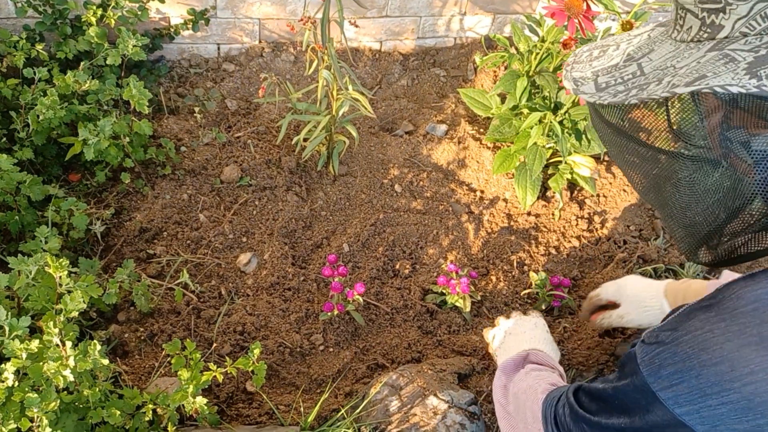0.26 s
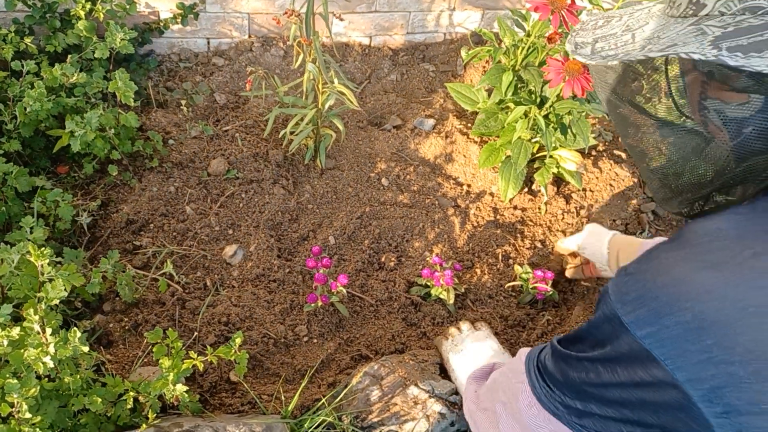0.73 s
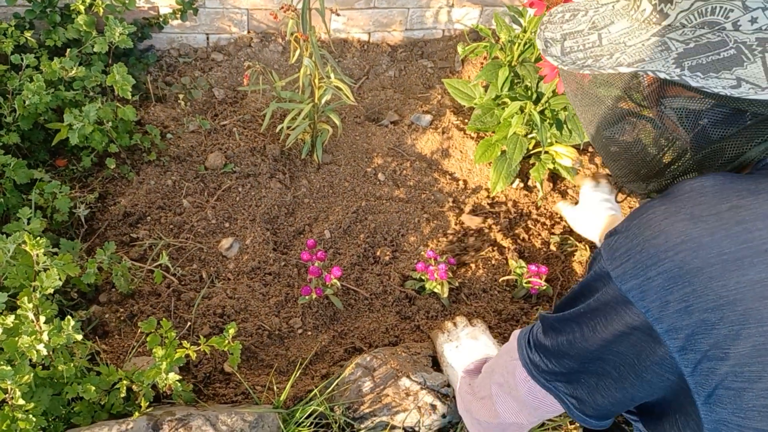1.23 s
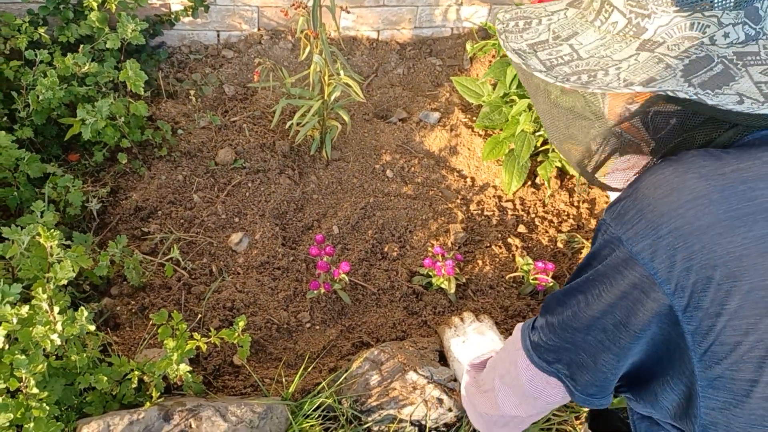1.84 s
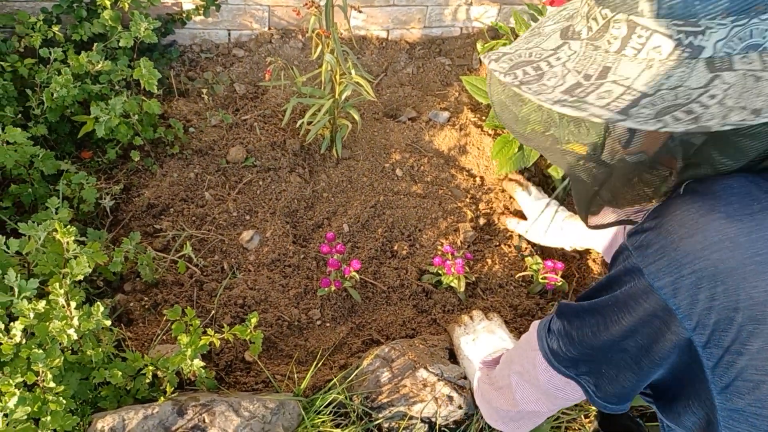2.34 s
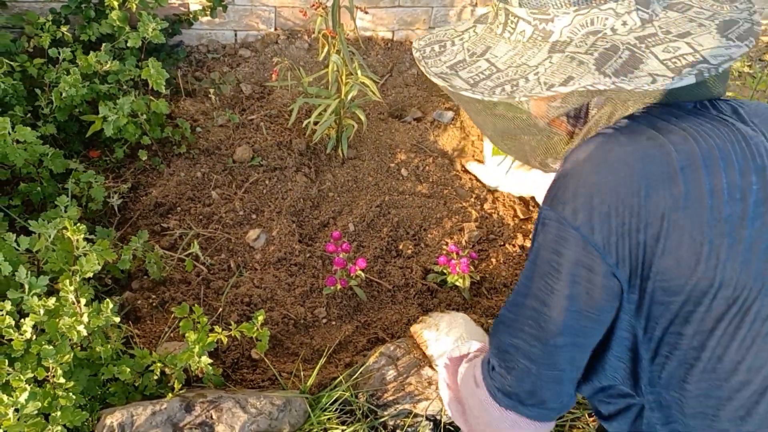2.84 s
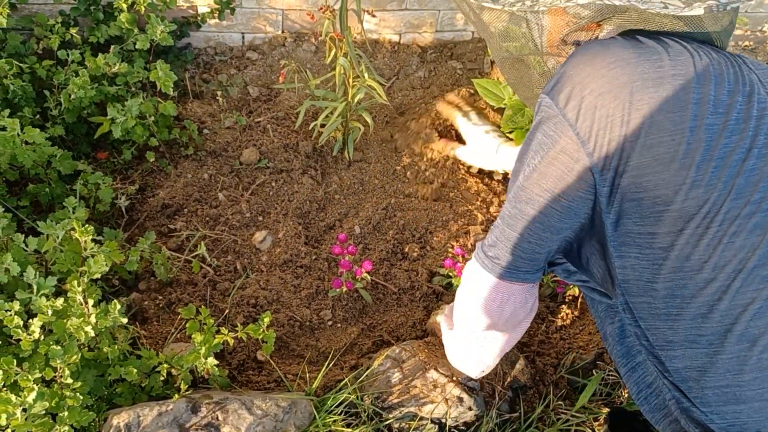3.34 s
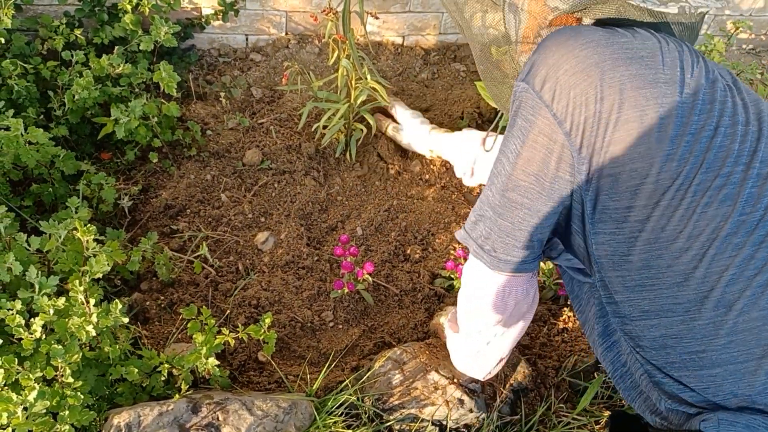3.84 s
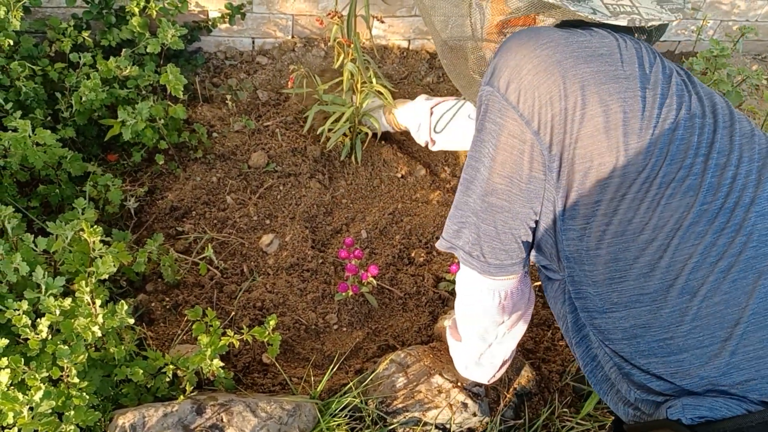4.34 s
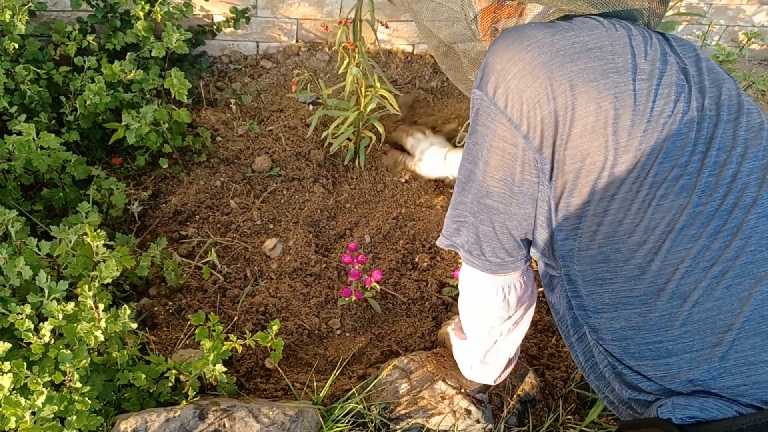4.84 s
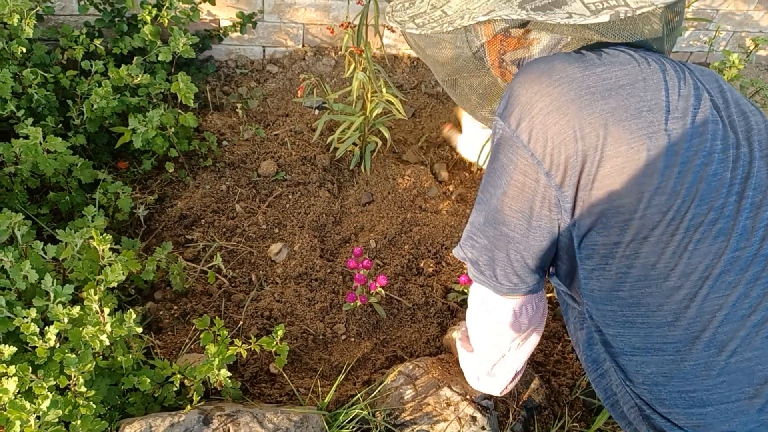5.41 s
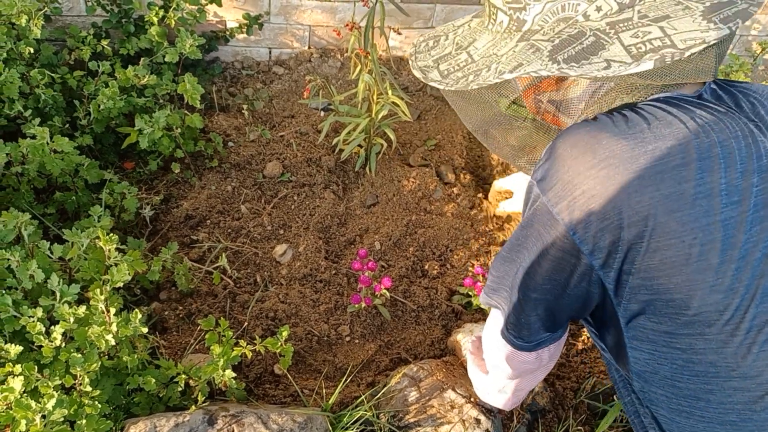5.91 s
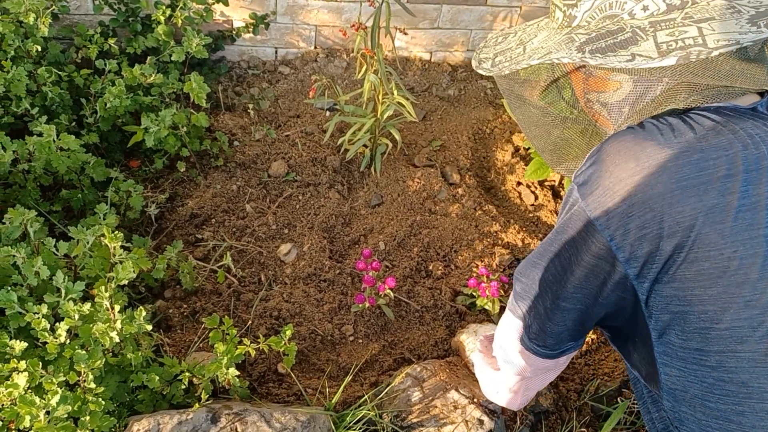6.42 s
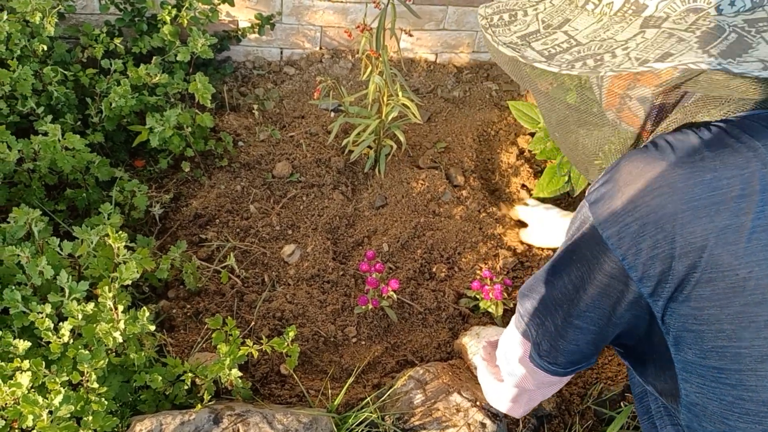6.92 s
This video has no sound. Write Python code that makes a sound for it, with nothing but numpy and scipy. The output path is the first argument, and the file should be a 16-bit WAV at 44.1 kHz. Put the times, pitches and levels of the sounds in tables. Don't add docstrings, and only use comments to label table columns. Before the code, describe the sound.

An open farmyard with a soft, swelling hum of distant machinery and air. At 0 s a cow's low is already ending, sinking by 0.45 s, while a close gloved hand scrapes crumbly soil and thin metal trinkets ring very high, busiest around 0.5 s and continuing until 2.6 s. A thin calf call wavers at 0.7-1.5 s. From 1.4 to 3.2 s a long moo climbs, holds loud, then drops and closes, with short closed-mouth grunts around it. A hard crunch of soil and cracking clods comes near 3 s; lighter raking follows. Sparrows chirp throughout, one nearer at 1.8, 3.3, 5.2 and 6.95 s. From 4.9 to 6.2 s several further cattle overlap, deep, hoarse and high, with echo; a higher calf call follows at 5.6-6.6 s. From 6.3 s wind buffets the right side in low thumps, strongest near 7 s, with a few muffled clinks.

```python
import sys
import numpy as np
from scipy import signal
from scipy.fft import rfft, irfft
from scipy.io import wavfile
from scipy.ndimage import uniform_filter1d

SR = 44100
rng = np.random.default_rng(int(sys.argv[2]) if len(sys.argv) > 2 else 0)


def waveform_to_disk(signal):
    frames = np.transpose(np.atleast_2d(signal))
    scaled = np.clip(frames, -1, 1) * 32767
    samples = np.round(scaled).astype(np.int16)
    wavfile.write(sys.argv[1], SR, samples)


def natural_amplitude(level_db):
    exponent = np.asarray(level_db, float) / 20
    return 10 ** exponent


N = 316197
T = np.arange(N) / SR


def level(x, db):
    return x * natural_amplitude(db) / np.sqrt(np.mean(x ** 2))


def band(x, lo_hz, hi_hz, order=2):
    return signal.sosfilt(signal.butter(order, [lo_hz, min(hi_hz, .45 * SR)], "bandpass", fs=SR, output="sos"), x)


def colour(x, points):
    hz, db = np.transpose(points)
    f = np.maximum(np.fft.rfftfreq(N, 1 / SR), 1)
    return irfft(rfft(x) * natural_amplitude(np.interp(np.log(f), np.log(hz), db)), N)


def walk(rate_hz, size=N):
    k = int(SR / rate_hz)
    held = np.repeat(rng.standard_normal(size // k + 1), k)
    return 1.386 * uniform_filter1d(uniform_filter1d(held, k), k)[:size]


def play(table, fade_s=0.014):
    s, *columns = np.transpose(table)
    span = slice(int(s[0] * SR), int(s[-1] * SR))
    t = T[span]
    since_start = t - s[0] + (s[0] < .01)
    ends = np.clip(np.minimum(since_start, s[-1] - t) / fade_s, 0, 1)
    return span, ends, [np.interp(t, s, c) for c in columns]


def add(out, start_s, x):
    i = int(start_s * SR)
    out[..., i:i + x.shape[-1]] += x[..., :max(N - i, 0)]


def swells(start_s, level_db, rise_s, fall_s, hold_s):
    curves = []
    for s, db, rise, fall, hold in np.broadcast(start_s, level_db, rise_s, fall_s, hold_s):
        away = np.maximum((s - T) / rise, (T - s - hold) / fall)
        curves.append(db - 20 * np.maximum(away, 0))
    return natural_amplitude(np.max(curves, axis=0))


def place(x, pan_db, lag_s, wet_db, t60):
    t = T[:SR // 3]
    echoes = rng.standard_normal((2, len(t))) * np.exp(-np.log(1000) * t / t60) * np.clip(t / 0.006, 0, 1)
    echoes *= natural_amplitude(wet_db) / np.sqrt(np.sum(echoes ** 2, axis=1, keepdims=True))
    echoes *= natural_amplitude(np.array([[pan_db], [-pan_db]]) / 2)
    left = np.interp(T - lag_s, T, x)
    direct = np.array([left * natural_amplitude(pan_db / 2), x * natural_amplitude(-pan_db / 2)])
    return direct + signal.fftconvolve(x[None], echoes, axes=1)[:, :N]


def thump(peak_db, hz, cycles=2.0):
    t = T[:SR // 10] * hz / cycles
    return natural_amplitude(peak_db) * np.e * 3 * t * np.exp(-3 * t) * np.sin(2 * np.pi * cycles * t)


def ring(hz, centre_hz, width_hz):
    return 1 / (1 + (2 * (hz - centre_hz) / width_hz) ** 2)


# freq_hz, density_db (per Hz)
FARM_SPECTRUM = [(15, -56), (25, -26), (133, 2), (189, -3.5), (242, 1), (415, -15), (860, -14), (1320, -33),
                 (1930, -41), (2820, -34.5), (3700, -25), (4350, -27), (5850, -35), (9770, -35),
                 (15900, -40)]
# time_s, level_db
MACHINERY_SWELL = [(0, 2), (.7, 0.5), (1.3, -3), (1.6, 2), (3.0, 3.5), (3.3, -4), (4.5, -3.5), (5.3, 2.5),
                   (6.0, 2), (6.3, -1.5), (7.17, -1)]


def farm():
    out, swell = 0, walk(1.69)
    rumble_db = np.interp(T, *np.transpose(MACHINERY_SWELL))
    noise = level(colour(rng.standard_normal((2, N)), FARM_SPECTRUM), -61)
    sides = np.array([[1], [-1]])
    for hz in 30 * 2 ** np.arange(.75, 9.5, .75):
        mid, side = band(noise, hz / 2 ** .375, hz * 2 ** .375)
        width = min(0.022 + hz / 900, 1)
        tilt = natural_amplitude(-1.8 * min(hz / 2500, 1) * sides)
        flicker_db = 0.26 * swell + 2.1 * walk(8) + rumble_db * ((hz > 60) & (hz < 1200))
        out = out + tilt * natural_amplitude(flicker_db) * (mid + width * side * sides)
    return out


# time_s, second_partial_hz, level_db, mouth_opening_db
CALF_CALLS = [
    [(.68, 800, -81, 6), (.76, 827, -73, 0), (.9, 840, -62, -22), (.99, 844, -69, -17),
     (1.05, 846, -68, -3), (1.12, 836.7, -63, -14), (1.3, 847.4, -71.5, -15), (1.5, 835, -67, -6)],
    [(5.6, 782, -85, 8), (5.7, 825, -74.5, -2), (5.85, 867.6, -68.5, -4), (6.0, 900, -63.5, -16),
     (6.1, 902.6, -73.5, -6), (6.3, 913, -70.5, -2), (6.4, 900, -59.5, -18), (6.47, 830, -73, -17),
     (6.62, 850, -81.5, -12)],
]


def calf():
    out = np.zeros(N)
    for table in CALF_CALLS:
        span, ends, (hz, level_db, open_db) = play(table)
        phase = 2 * np.pi * np.cumsum(hz * (1 + 0.0091 * walk(60.1, len(hz)))) / SR
        for k, db in zip((2, 3, 4), (0, open_db - 15, open_db)):
            gain = natural_amplitude(level_db + db + 3.7 * walk(30.46, len(hz)))
            out[span] += 2.0 * ends * gain * np.sin(k * phase / 2)
    return out


CHEST_HZ, CHEST_WIDTH_HZ, THROAT_WIDTH_HZ = 263, 236, 227
# freq_hz, width_hz, level_db
MOUTH_RINGS = [(1325, 290, -1.5), (1803, 110, -14), (2210, 700, -20)]


def cow(table, odd_db, chest_hz, mouth_scale, rough, slack, air_db):
    span, ends, (hz, chest_db, throat_db, throat_hz) = play(table, fade_s=0.098)
    mouth_db = -2.5 + 0.59 * throat_db
    mouth_shift = mouth_scale * (throat_hz / 830) ** 0.27
    n = len(hz)
    rough = np.clip(rough + slack * (1 - hz / hz.max()), 0, 1)
    phase = 2 * np.pi * np.cumsum(hz * (1 + 0.026 * rough * walk(50.6, n))) / SR
    out = np.zeros(N)
    for k in range(1, 14):
        tract = ring(k * hz, chest_hz, CHEST_WIDTH_HZ)
        tract += natural_amplitude(throat_db) * ring(k * hz, throat_hz, THROAT_WIDTH_HZ)
        for ring_hz, width_hz, db in MOUTH_RINGS:
            tract += natural_amplitude(mouth_db + db) * ring(k * hz, ring_hz * mouth_shift, width_hz)
        fade_db = air_db * walk(7.28, n) + 7 * rough * walk(30.4, n) + (k % 2) * odd_db
        skirt = 1 + 2.54 * np.sqrt(rough * min(k / 4, 1)) * walk(160, n)
        out[span] += tract * natural_amplitude(fade_db) * skirt * np.sin(k * phase + rng.uniform(0, 2 * np.pi))
    out[span] *= natural_amplitude(chest_db) * ends
    return out


# time_s, pitch_hz, level_db, mouth_opening_db, throat_hz
COW_LOW = [
    (4.9, 106.6, -77, -36, 481),
    (5.15, 118.2, -57.5, -24, 600),
    (5.266, 131.4, -63, -11.5, 597),
    (5.36, 141.2, -71, 14, 520),
    (5.46, 141.3, -71.5, 18, 540),
    (5.6, 146, -76, 22.5, 570),
]
COW_HOARSE = [
    (5.42, 244.7, -79, 8, 520),
    (5.52, 246.5, -70, 8, 520),
    (5.6, 245.3, -61, 10, 590),
    (5.66, 249.5, -63.5, 11.5, 550),
    (5.74, 254.3, -64, 8.8, 620),
    (5.87, 252, -64, 6.1, 605),
    (5.96, 245.7, -71, 5.9, 560),
    (6.1, 233, -86, 3.1, 558),
]
COW_STEADY = [
    (5.36, 234.3, -79, 4, 935),
    (5.47, 235.4, -71, 8.5, 915),
    (5.6, 236.6, -59, -5, 867),
    (5.72, 239.5, -45.5, -19.5, 730),
    (5.8, 237.1, -54, -7, 786),
    (5.88, 234.6, -45, -29, 780),
    (5.97, 231.1, -57.5, -24, 720),
    (6.2, 227.3, -78.5, -20, 700),
]
HEIFER = [
    (5.15, 389, -75, -2, 790),
    (5.24, 396, -65, 3.5, 790),
    (5.32, 397, -73, 5.5, 790),
    (5.42, 398, -87, 3, 790),
]


def far_cows():
    out = cow(COW_LOW, 0.16, 120, 0.78, rough=0.09, slack=0.011, air_db=2.5)
    out += cow(COW_HOARSE, 0.11, 250, 0.884, rough=0.24, slack=0.19, air_db=1.5)
    out += cow(COW_STEADY, 0.1, 245, 0.69, rough=0.13, slack=0.35, air_db=2.4)
    return out + cow(HEIFER, 0.1, 395, 0.82, rough=0.045, slack=0.1, air_db=2.5)


# start_s, peak_db, pitch_hz
GRUNTS = [(0.3, -49, 280), (0.358, -49.5, 293), (1.551, -47, 230), (1.619, -45, 263), (2.016, -49.5, 187),
          (3.0, -42.5, 283.5), (3.074, -42.5, 290.7), (5.191, -51.5, 223), (5.29, -50, 208),
          (6.454, -41.5, 262), (6.51, -47.5, 266), (6.553, -46.5, 279), (6.631, -56, 260)]


def grunts():
    out = np.zeros(N)
    for start_s, peak_db, hz in GRUNTS:
        add(out, start_s, thump(peak_db, hz, cycles=6.5))
    return out


# time_s, pitch_hz, level_db, mouth_opening_db, throat_hz
COW_TAIL = [
    (0.0, 182.3, -53.5, 4.5, 1040),
    (0.19, 175.8, -57, 4, 990),
    (0.27, 160.4, -50, -15.5, 844),
    (0.45, 135.8, -74.5, -16, 825),
]
COW_LONG = [
    (1.41, 138.8, -72, 10.5, 1010),
    (1.62, 167.4, -58, 5, 976),
    (1.76, 178.5, -61.5, 17, 1032),
    (1.97, 193, -55, 5.5, 790),
    (2.382, 198.9, -45.5, -3.5, 867),
    (2.648, 194.4, -54, 11.5, 740),
    (2.856, 188.9, -47, -8.5, 744),
    (2.968, 158.8, -54, 4, 1070),
    (3.2, 135, -66, -59, 830),
]


def near_cow():
    tail = cow(COW_TAIL, -1.1, CHEST_HZ, 1.06, rough=0.016, slack=1.0, air_db=1.4)
    long_low = cow(COW_LONG, -0.19, 319, 1.0, rough=0.011, slack=0.13, air_db=2.08)
    return tail + long_low + grunts()


def whistle(hz, db, warble):
    n = len(hz)
    throb = natural_amplitude(db + 3.48 * walk(267.0, n))
    return throb * np.sin(2 * np.pi * np.cumsum(hz * (1 + warble * walk(900, n))) / SR)


def glide(centre_hz, octaves, db, length_s, warble):
    u = np.linspace(0, 1, int(length_s * SR))
    return np.sin(np.pi * u) * whistle(centre_hz * 2 ** (octaves * (2 * u - 1)), db, warble)


# start_s, peak_db
CHIRRUPS = [
    (1.82, -44),
    (3.3316, -42.5),
    (5.1792, -46.5),
    (6.9536, -43.5),
]
# time_s (after the start), pitch_hz, level_db
PHRASE = [
    (0, 3780, -6),
    (.008, 4320, -4.5),
    (0.02, 4710, 3.5),
    (.036, 4880, 3),
    (.039, 3986, 4),
    (0.048, 3500, 1.5),
    (.064, 3240, 1),
    (0.079, 3250, -27),
]
# start_s, peak_db, centre_hz, half_sweep_octaves
PEEPS = [(1.223, -64, 5860, 0.037), (1.254, -58.5, 4610, 0.15), (1.315, -67, 6260, 0.022),
         (1.36, -65, 4780, 0.09), (1.86, -58, 5810, 0.041), (1.924, -58.5, 4080, 0.13),
         (2.451, -64.5, 4510, 0.091), (2.489, -61.5, 3920, -0.031), (3.67, -66, 5800, 0),
         (5.725, -65, 5690, -0.0066), (5.827, -70, 5950, 0.011)]
# start_s, peak_db, centre_hz, half_sweep_octaves, length_s
NOTES = [(.648, -58, 4940, 0.1, 0.013), (0.658, -61, 6000, 0, 0.026), (0.68, -55, 5070, -0.15, 0.011),
         (0.686, -59, 3920, -0.147, 0.044), (0.719, -56.5, 3970, .16, .018),
         (1.903, -49, 3890, 0.082, 0.0096), (2.325, -65, 3920, -0.018, 0.038),
         (2.531, -60.5, 3650, 0.2, 0.014), (2.279, -63.5, 4500, -0.036, 0.074),
         (2.439, -66, 4500, 0.082, 0.027), (2.469, -60.5, 5850, 0, .035), (3.131, -63, 5750, 0, 0.033),
         (3.155, -57.5, 3900, -0.042, 0.029), (3.194, -61.5, 3700, 0.18, 0.017),
         (4.328, -71, 4550, 0, 0.084), (4.36, -67, 3800, .05, 0.044), (4.518, -66, 4500, 0.14, 0.068),
         (4.95, -62, 5500, 0.019, 0.028), (5.01, -62, 3800, 0.23, .016), (6.034, -71.5, 4900, 0, 0.14),
         (6.051, -65, 4550, -0.047, 0.059), (3.69, -63.5, 4200, -0.084, 0.0345),
         (3.763, -66, 6060, 0, 0.037), (3.901, -60, 4970, -0.021, 0.019), (3.902, -65, 3980, 0.036, 0.014),
         (5.756, -66, 3950, -0.092, 0.028), (5.79, -71, 3360, -0.0035, 0.023),
         (6.016, -75, 4730, -0.0041, 0.061), (6.101, -65.5, 4580, -0.072, 0.059),
         (6.105, -69, 3990, -0.04, 0.084), (6.421, -72, 3434, 0.013, 0.12),
         (6.494, -66, 4900, -0.0077, 0.023)]
# start_s, peak_db, centre_hz
CHEEPS = [(0.1172, -54, 4180), (0.4742, -59, 4400), (0.58, -61.5, 4450), (0.64, -60, 3900),
          (1.376, -57.5, 3930), (1.42, -65, 3530), (1.506, -57, 4230), (1.656, -54.5, 4310),
          (1.6836, -56.5, 3615), (2.0548, -53, 4280), (3.289, -54.5, 4450), (3.6667, -56.5, 4410),
          (3.86, -59, 3840), (3.93, -57.5, 3650), (4.325, -61, 4500), (4.3737, -70, 3850),
          (4.94, -55.5, 4550), (4.98, -57.5, 3615), (5.28, -56, 4010), (5.4737, -60.5, 4458),
          (5.769, -72, 3940), (6.49, -60, 4310), (6.765, -57.5, 3740), (6.845, -60, 4360)]


def sparrows():
    near, others, far = np.zeros((3, N))
    s, hz, db = np.transpose(PHRASE)
    t = T[:int(s[-1] * SR)]
    for start_s, peak_db in CHIRRUPS:
        phrase_db = peak_db - 5 + np.interp(t, s, db)
        add(near, start_s, whistle(np.interp(t, s, hz), phrase_db, warble=0.032))
    for start_s, peak_db, centre_hz, octaves in PEEPS:
        add(others, start_s, glide(centre_hz, octaves, peak_db + 4.5, 0.0266, warble=0.019))
    for start_s, peak_db, centre_hz, octaves, length_s in NOTES:
        add(others, start_s, glide(centre_hz, octaves, peak_db + 1.5, length_s, warble=0.012))
    for start_s, peak_db, centre_hz in CHEEPS:
        add(far, start_s - .015, glide(centre_hz, -0.1254, peak_db - 7.5, .09, warble=0.075))
    out = place(near, -0.7, -0.000064, -5.5, 0.29)
    out += place(others, -6.0, -0.000057, -3.0, 0.34)
    return out + place(far, -2.5, -0.000012, 1.2, 0.45)


# start_s, level_db, hold_s
GUSTS = [(4.51, -76, 0.015), (5.01, -60.5, 0.14), (5.401, -49.5, 0.08), (6.327, -45, 0.043),
         (6.378, -40, 0.064), (6.588, -45, 0.0073), (6.69, -36.5, 0.045), (6.754, -44.5, 0.094),
         (6.898, -42, 0.04), (6.967, -33, 0.12), (7.165, -29.5, .01)]
# start_s, peak_db, pitch_hz
BUFFETS = [(6.310, -37, 106.4), (6.365, -26.5, 106), (6.395, -31, 119), (6.43, -28.5, 128),
           (6.460, -30.5, 110), (6.506, -43, 260), (6.682, -31.5, 130), (6.708, -23.5, 102.5),
           (6.729, -27, 135), (6.793, -28, 135), (6.85, -30.5, 95), (6.906, -29, 177), (6.927, -29.5, 146),
           (6.986, -31, 108), (7.060, -30.5, 98), (7.095, -19.5, 114)]
# start_s, peak_db, pitch_hz
SLAPS = [(6.434, -41, 322), (6.581, -29, 154), (6.683, -36, 229), (6.714, -37, 298), (6.803, -32.5, 310),
         (6.846, -45, 330), (6.91, -42, 238), (6.929, -34, 268), (6.956, -17.5, 322), (7.009, -34, 240),
         (7.111, -44, 320), (6.953, -16, 197), (6.9613, -12, 150), (7.035, -16.5, 132), (7.163, -39, 410)]


def wind():
    s, db, hold_s = np.transpose(GUSTS)
    eddies = band(band(rng.standard_normal((2, N)), 44, 178.5), 55, 280) * natural_amplitude(3.0 * walk(29.46))
    shelter = natural_amplitude(np.array([[-26], [0]]))
    out = level(eddies, 6.0) * shelter * swells(s, db, rise_s=0.023, fall_s=0.093, hold_s=hold_s)
    for start_s, peak_db, hz in BUFFETS:
        add(out[1], start_s, thump(peak_db + 3.5, hz, cycles=1.86))
    for start_s, peak_db, hz in SLAPS:
        add(out[1], start_s, -thump(peak_db, hz, cycles=1.65))
    return band(out, 23, 520)


# start_s, peak_db, loudest_ring_hz
JINGLES = [(0.02, -45, 13000), (0.079, -38, 12000), (0.22, -40.5, 13700), (0.36, -48, 15100),
           (0.45, -53, 10800), (0.489, -43, 12000), (0.51, -39.5, 15000), (0.5362, -30, 12400),
           (0.5837, -35, 11600), (0.623, -36, 12350), (0.654, -47, 14800), (0.682, -37, 11400),
           (1.067, -47.5, 10900), (1.122, -42, 13700), (1.159, -45, 14100), (1.184, -39, 13000),
           (1.2, -42.5, 9800), (1.249, -44, 13000), (1.271, -45, 9800), (1.29, -47, 13000),
           (1.318, -40, 13100), (1.327, -37, 9700), (1.4165, -56, 7240), (1.4394, -54, 12900),
           (1.522, -49, 12900), (1.633, -40, 13000), (1.681, -49, 7240), (1.772, -50, 7240),
           (1.794, -44.5, 10400), (1.903, -49.5, 11000), (2.037, -47, 9720), (2.091, -35.5, 13600),
           (2.166, -42.5, 13700), (2.252, -53, 11800), (2.295, -47, 13900), (2.382, -47.5, 11800),
           (2.4798, -50.5, 11600), (2.526, -43, 13360)]
# start_s, peak_db, loudest_ring_hz
MUFFLED = [
    (6.8034, -45.5, 13500),
    (6.8495, -38.5, 12300),
    (6.9501, -50, 12470),
    (6.997, -46, 13700),
    (7.0469, -46, 10600),
]
# freq_hz, width_hz, level_db
TRINKETS = [
    [(10100, 72, -8), (10900, 34, -10), (11400, 36, 0), (11600, 52, 3), (12000, 32, -6), (12100, 34, -12),
     (13000, 46, -6), (13550, 92, -7), (14200, 34, -2), (14800, 38, -1), (14900, 59, 4), (15500, 180, 5)],
    [(6720, 40, -20), (7240, 48, -11), (9800, 150, 10), (10400, 32, -7), (10900, 36, -6), (11000, 26, -14),
     (11600, 22, -17), (11800, 64, -5), (12000, 95, -17), (12200, 95, -11), (13000, 180, 4),
     (14200, 210, -2)],
    [(7400, 56, -22), (9520, 65, -30), (9700, 37, -19), (9800, 67, -35), (10600, 31, -2), (11600, 86, 9),
     (11900, 76, -5), (12300, 42, -28), (13700, 37, -1), (13900, 45, 2), (14200, 17, -14),
     (15100, 160, -17)],
]


def trinkets():
    out, t = np.zeros(N), T[:SR // 6]
    for start_s, peak_db, top_hz in JINGLES + MUFFLED:
        bout = np.searchsorted((.9, 1.95), start_s)
        hz, width_hz, db = np.transpose(TRINKETS[bout])
        chance = rng.standard_normal((3, len(hz)))
        share_db = 0.59 * db - np.minimum(abs(hz - top_hz) / 100, 8) + 3 * chance[0]
        t60 = (.13 if start_s < 3 else .022) * 1.4 ** chance[1]
        rattle = np.array([walk(300, len(t)) for _ in hz])
        chatter = natural_amplitude(3.9 * rattle)
        waver = np.cumsum(0.81 * width_hz[:, None] * rattle[::-1], axis=1) / SR
        detuned_hz = hz * (1 + 0.00272 * chance[2])
        modes = np.sin(2 * np.pi * (np.outer(detuned_hz, t) + waver))
        modes *= np.exp(-np.log(1000) * t / t60[:, None])
        rings = natural_amplitude(share_db) @ (modes * chatter)
        shimmer = band(rng.standard_normal(len(t)), top_hz - 2400, top_hz + 1300)
        shimmer *= np.exp(-np.log(1000) * t / np.mean(t60))
        rings = (rings + level(shimmer, -28) * np.std(rings)) * np.clip(t / 0.009, 0, 1)
        add(out, start_s, natural_amplitude(peak_db - 3.0) * rings / np.max(abs(rings)))
    return place(out, -4.5, -.00006, -7, .07)


# freq_hz, density_db (per Hz)
SOIL = [(300, -15.5), (590, -8.5), (1000, -9.5), (1400, -9.5), (2410, -9.5), (3000, -12), (3450, -4.5),
        (14500, -11.5), (15900, -13)]
# peak_s, level_db, rise_s, fall_s, low_crunch_db (relative)
STROKES = [(.04, -59, 0.26, 0.14, 8), (.38, -70, 0.67, 0.071, 10.5), (.8, -67, 0.65, 0.14, -0.5),
           (1.32, -71.5, 0.72, 0.29, -7), (1.54, -66.5, 0.18, 0.064, -9), (1.64, -61.5, 0.029, 0.063, -7),
           (2.68, -65, 0.19, 0.16, 5), (2.791, -61, 0.012, 0.31, -12), (2.991, -48.5, 0.21, 0.12, 6.5),
           (3.09, -66, .05, 0.064, 11), (3.37, -67.5, 0.24, 0.78, -0.5), (3.668, -68, 0.079, 0.41, -1),
           (4.25, -70, 0.5, 0.4, -2), (4.85, -71, 0.55, 0.47, -2.5), (5.31, -67, 0.22, 0.18, 0.5),
           (5.81, -75.5, 1.07, 0.77, 3), (6.19, -74.5, 0.28, 1.7, 1.5), (6.4, -67.5, 0.14, 0.3, 6.5),
           (6.77, -70, 0.15, 7.4, -1.5), (7.17, -83, 0.015, 0.077, 2)]
# start_s, level_db, rise_s, fall_s, hold_s, low_crunch_db (relative)
STEADY_RAKE = (2, -70.5, 1.4, 0.28, 1.18, 6.5)
# peak_s, level_db, rise_s, fall_s
CRUSTS = [
    (.05, -46, .25, 0.043),
    (3.66, -60, 0.033, 0.063),
    (4.855, -62, 0.028, .05),
    (6.4, -61, 0.071, 0.048),
    (6.845, -62, 0.026, .04),
    (6.91, -65, .03, 0.12),
]
# start_s, peak_db, pitch_hz
CLODS = [(0.22, -45, 1460), (0.359, -57, 1550), (0.7086, -47, 3710), (0.805, -42.5, 6800),
         (1.296, -55, 1800), (1.731, -42, 2000), (2.6801, -45, 8700), (2.8612, -34, 1080),
         (2.9036, -43, 1030), (2.941, -30, 1100), (2.96, -34, 1270), (2.9974, -21.5, 1400),
         (2.998, -35, 7500), (3.0799, -41.5, 2240), (3.351, -49, 3210), (3.505, -45, 2380),
         (3.575, -45.5, 1800), (3.657, -46, 1800), (5.021, -63, 3900), (4.831, -46, 3200),
         (4.8803, -43.5, 11900), (5.31, -45.5, 4580), (5.741, -49.5, 5750), (5.945, -58, 1800),
         (6.391, -42, 2050), (6.8043, -46, 3940), (7.118, -42.5, 5140), (7.163, -36.5, 870)]


def raking():
    strokes = np.insert(STROKES, 4, 0, axis=1)
    s, db, rise_s, fall_s, hold_s, low_db = np.vstack([strokes, STEADY_RAKE]).T
    big_grains = np.minimum(rng.exponential(size=N), 4.5) * (rng.random(N) < .05)
    grains = rng.standard_normal((2, N)) * natural_amplitude(4.04 * big_grains + 2.58 * walk(40))
    crumbs = colour(grains, SOIL)
    crumbs = crumbs / np.std(band(crumbs, 5700, 9860)) * 1.184
    low = band(crumbs, 640, 3140)
    out = swells(s, db, rise_s, fall_s, hold_s) * (crumbs - low)
    out += swells(s, db + low_db, rise_s, fall_s, hold_s) * low
    grit_db = np.minimum(db + low_db, -68) - 1.5
    out += swells(s, grit_db, rise_s, fall_s, hold_s) * band(crumbs, 1620, 2220)
    out += swells(*np.transpose(CRUSTS), 0) * band(crumbs, 1680, 2400)
    t = T[:2000]
    for start_s, peak_db, hz in CLODS:
        crumble_s = .001 * natural_amplitude((peak_db + 50) * .5)
        crack = band(rng.standard_normal((2, len(t))), hz / 2.0, hz * 2.26)
        crack = crack * t / crumble_s * np.exp(1 - t / crumble_s)
        add(out, start_s, natural_amplitude(peak_db - 6.0) * crack)
    return out * natural_amplitude(np.array([[-2.2], [2.2]]))


def scene():
    herd = place(near_cow(), -0.88, -0.00017, -4.0, 0.46)
    herd += place(far_cows(), 0.32, -0.00026, -12.0, 0.97)
    herd += place(calf(), -1.0, 0.0004, -2.5, 0.77)
    return farm() + herd + sparrows() + wind() + trinkets() + raking()


def low_pass(x):
    return signal.sosfilt(signal.butter(12, 16040, fs=SR, output="sos"), x)


def record(dry):
    no_bass = signal.sosfilt(signal.butter(3, 62, "high", fs=SR, output="sos"), dry)
    mix = signal.sosfilt(signal.ellip(10, .2, 70, 15750, fs=SR, output="sos"), no_bass)
    return low_pass(mix)


dry = scene()
out = record(dry)
waveform_to_disk(out)
```